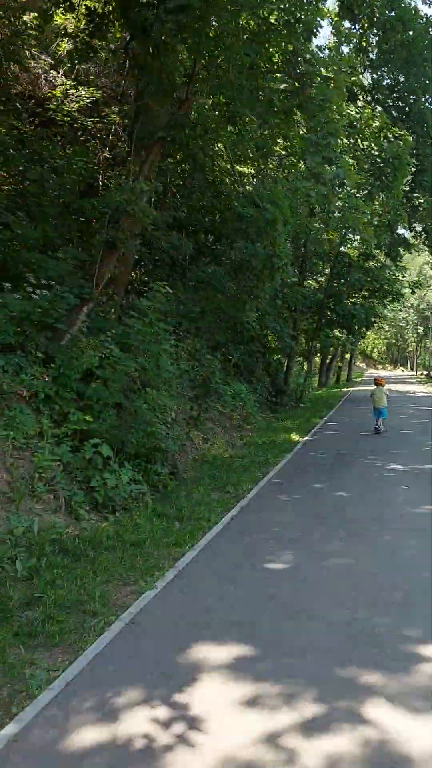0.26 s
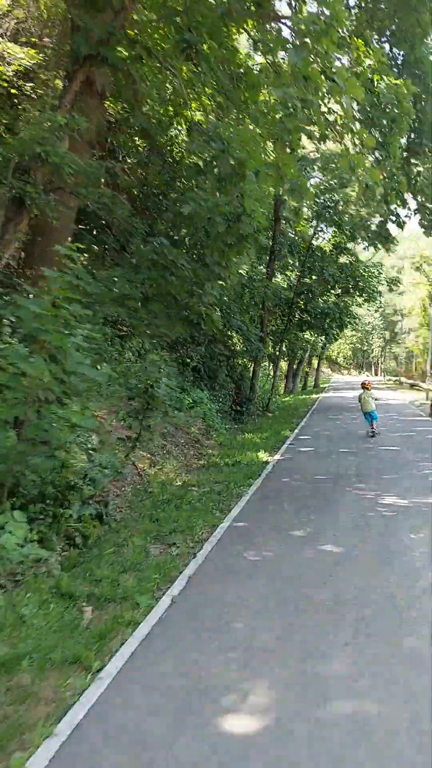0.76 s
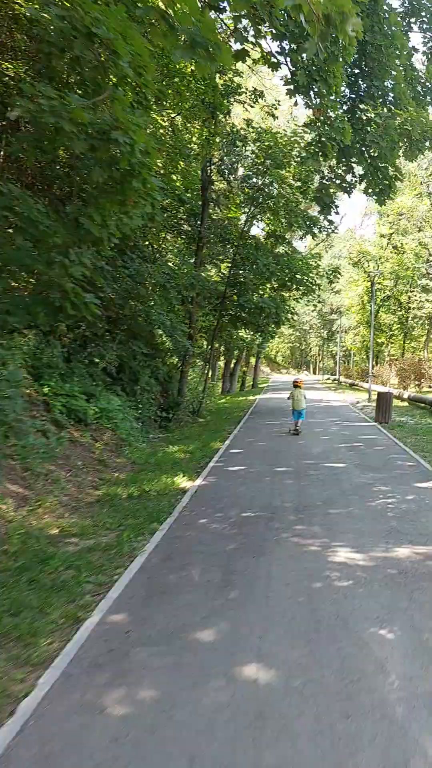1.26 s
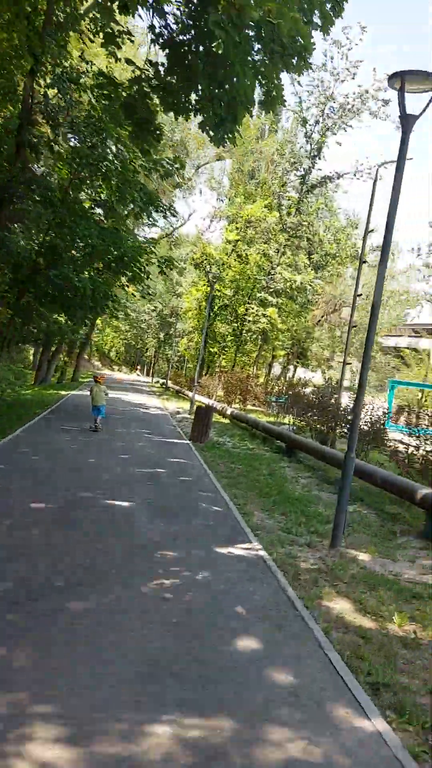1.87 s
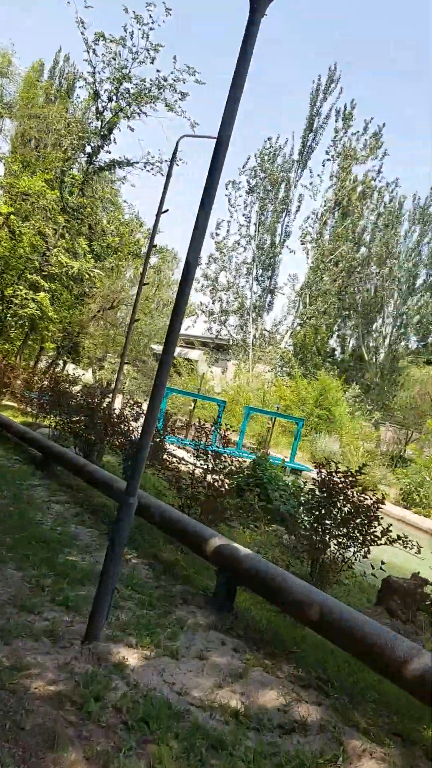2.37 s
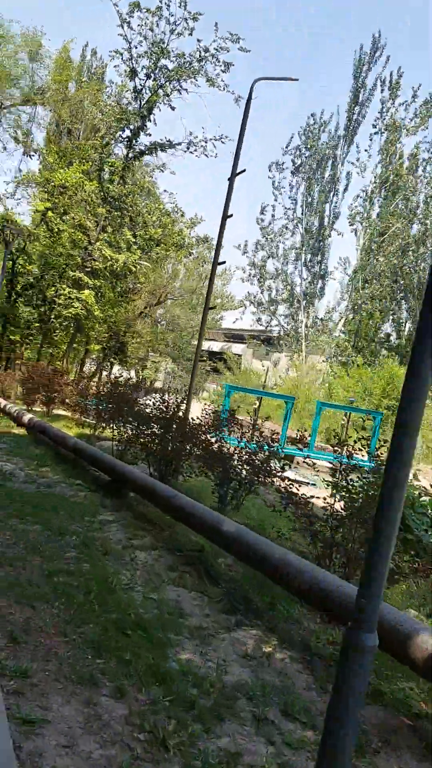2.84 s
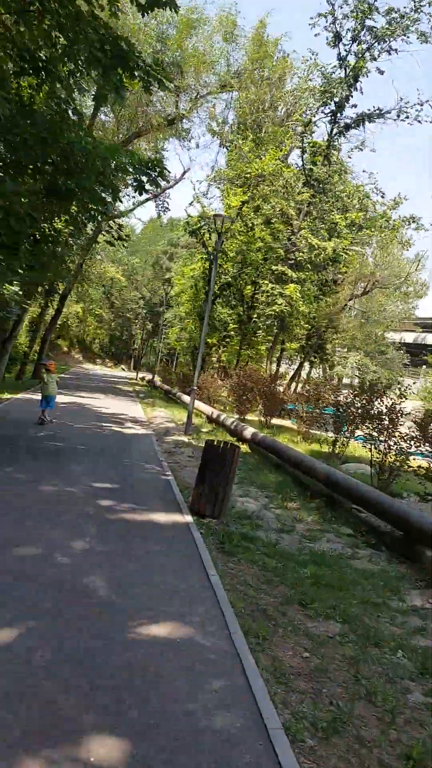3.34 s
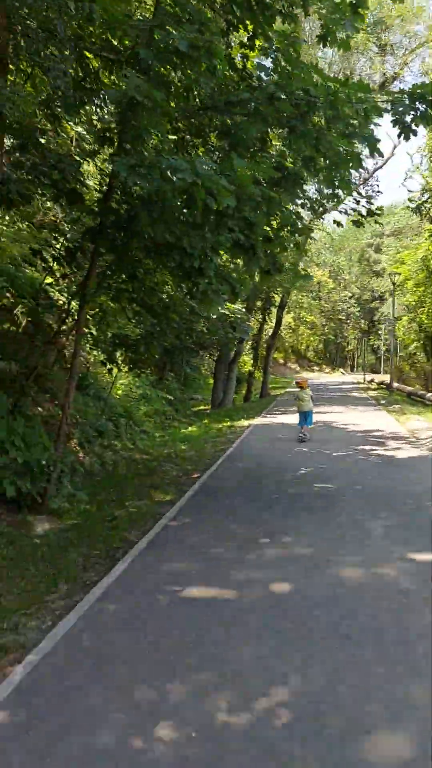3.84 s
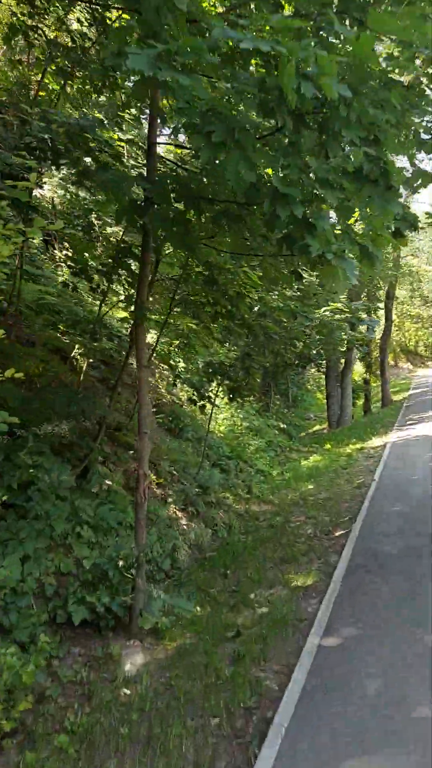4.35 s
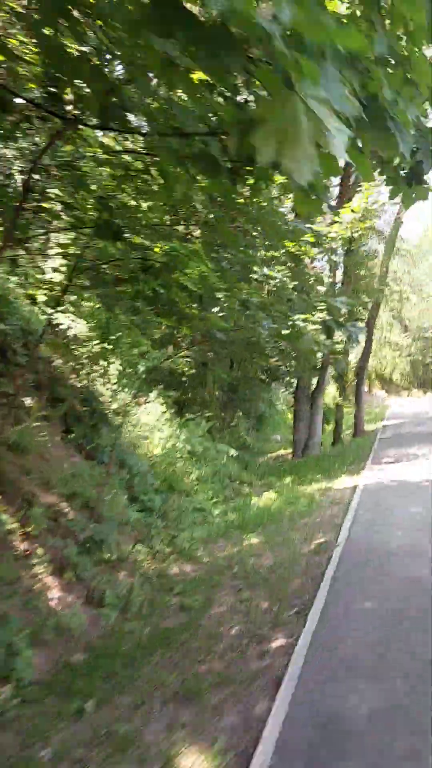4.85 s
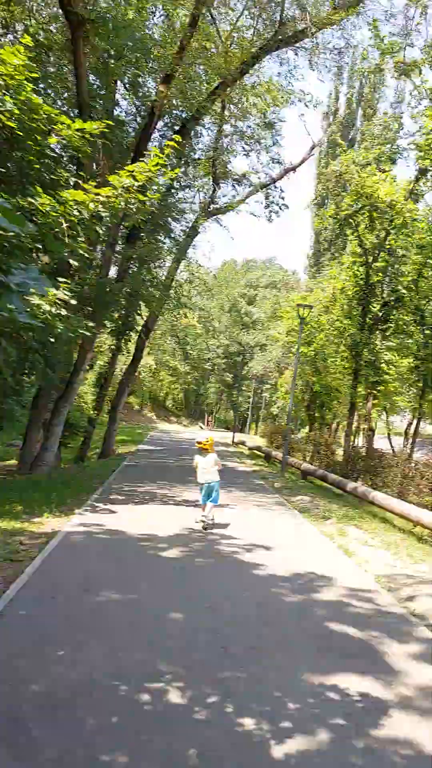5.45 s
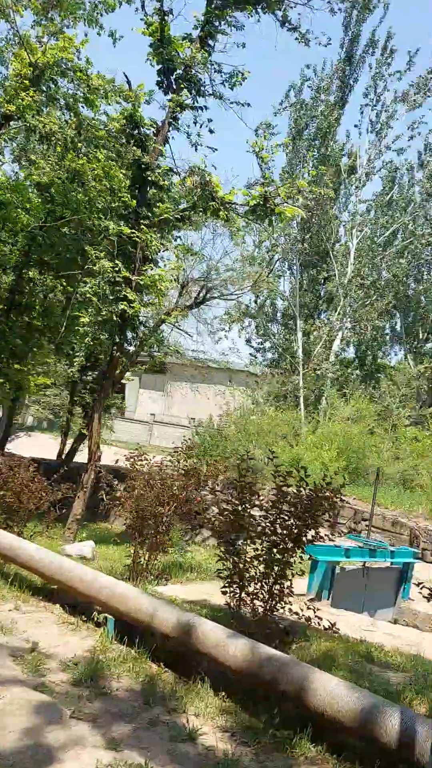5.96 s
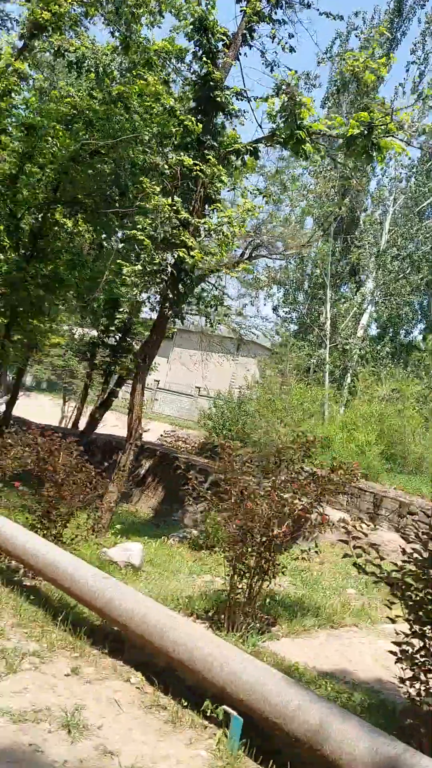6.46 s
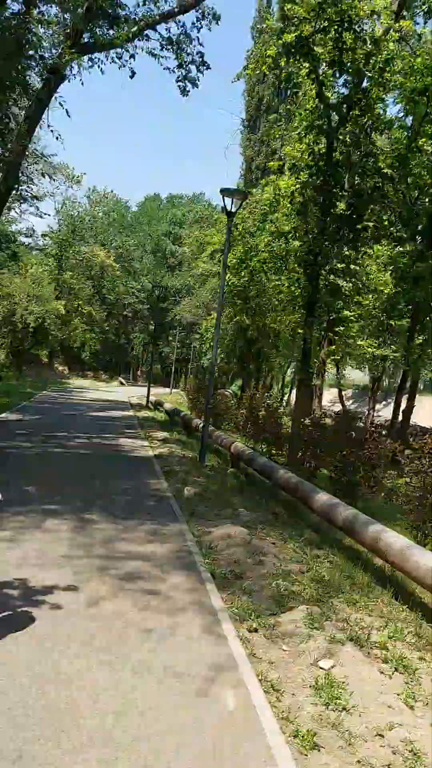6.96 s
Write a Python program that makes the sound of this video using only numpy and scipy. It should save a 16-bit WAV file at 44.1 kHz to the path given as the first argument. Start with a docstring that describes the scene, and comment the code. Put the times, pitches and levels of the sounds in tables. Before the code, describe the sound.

Throughout the seven seconds a skateboard rolls along an asphalt path in the open air, heard close by a handheld stereo phone with no noticeable echo. From the start, a hollow, uneven deck rumble mixes with dry crunching grit, short wheel rattles and dull clacks. Thumps fall at about 0.05, 0.45 and 1.05 s, with sharp ticks before 1.3 s and a brief gust at 0.9. From 1.3 to 3.8 s low crosswind flutters and fizzes on the right, over bumps near 1.4, 1.55, 2.2, 2.4 and 3.5; stony pings and a coarse, sandy burst come around 1.3 to 2.2. The wind then drops sharply, leaving a short gust at 4.05 and clearer rolling. Thumps cluster from 4.2 to 5.1 and 5.5 to 5.8 s. Sand hisses near 5.5 and 6.2 as the crunch grows brightest; another bump hits at 6.5, and rolling continues to the end.

```python
"""A skateboard rolls along an asphalt park path, heard at a phone's two ports in the rider's hand.
From the start, stones drum the deck into a rumble and grains crunch under the tread, with thumps and ticks.
The first gusts buffet within a second; from 1.3 to 3.8 s a crosswind buffets and fizzes at the right port.
Patches of sand burst near 1.7, 5.5 and 6.2 s, and past 5.7 s the crunch is at its brightest.
Sources are random blows or noise, shaped by spectra, resonances and levels that follow time."""
import sys
import numpy as np
from scipy import signal
from scipy.fft import rfft, irfft
from scipy.io import wavfile
from scipy.ndimage import map_coordinates

SR = 44100
rng = np.random.default_rng(int(sys.argv[2]) if len(sys.argv) > 2 else 0)


def int16_out(signal):
    """Quantize to a 16-bit WAV file."""
    q = np.round(np.clip(np.atleast_2d(signal).T, -1, 1) * 32767)
    wavfile.write(sys.argv[1], SR, q.astype(np.int16))


N = 317961
T, HZ = np.arange(N) / SR, np.fft.rfftfreq(N, 1 / SR)
PORT_LAG_S = 21 / SR  # sound from the board reaches the left port this much later

# All levels in the tables are relative: each source adds its own trim.
# A half length or half width is the distance from the centre at which a hump has fallen to half.

# faint hiss, colour: hz, level_db
HISS_COLOUR = [(500, 16.5), (7000, -9), (9000, -4), (12000, 4.5), (16000, 0.5)]
# faint hiss, level in time: time_s, level_db
HISS_LEVEL = [(0, -55), (1.3, -52), (3.76, -64), (3.8, -55), (4.3, -56), (5.3, -53.5), (7.2, -51.5)]
# soft swell of the hiss: peak_s, half_length_s, level_db
HISS_SWELLS = [(.52, 0.25, -55)]
# air stream of the ride: time_s, level_db
AIR_STREAM = [(0, -33), (1.5, -35), (2.0, -35.5), (3.6, -36), (4.35, -35), (4.6, -41.5), (5.0, -35.5),
              (5.6, -36), (6.3, -42.5), (6.8, -35), (7.2, -33.5)]
# wind blowing straight at the right port for a while: time_s, buffeting_db, fizz_db
CROSSWIND = [(1.34, -54, -70), (1.42, -21.5, -50), (1.67, -25.5, -46), (1.75, -30, -45), (1.82, -26.5, -49),
             (2.01, -27.5, -48), (2.14, -21, -47), (2.44, -20.5, -54), (2.52, -27, -47), (2.64, -23.5, -49),
             (2.86, -19, -48.5), (3.22, -21.5, -48.5), (3.5, -20.5, -53), (3.765, -19.5, -58),
             (3.83, -60, -110)]
# single gusts: peak_s, half_length_s, left_port_db, right_port_db
GUSTS = [(0.33, 0.08, -31, -32), (0.88, 0.011, -20.5, -28), (0.95, 0.034, -36, -32),
         (2.307, 0.038, -41, -21), (2.854, 0.014, -42, -17.5), (2.968, 0.026, -36, -18.5),
         (3.284, 0.023, -32, -18.5), (3.662, 0.016, -21, -16), (3.76, 0.045, -27, -34),
         (4.063, 0.017, -23.5, -27)]
# colour of the buffeting: hz, left_port_db, right_port_db
BUFFET_COLOUR = [(15, -32, -23), (30.2, -22, -40), (45.3, -4.5, -7), (62.4, -4, 2.5), (88, -6, 1.5),
                 (139, 1.5, 2), (191, -9.5, -2), (286, -5, -5), (493, -47, -14), (770, -31, -31),
                 (1500, -60, -41), (4000, -80, -85)]
# colour of the fizz: hz, level_db
FIZZ_COLOUR = [(1000, -12), (4000, -11.5), (7000, -15), (8800, -28), (10500, 0), (12500, 11), (15800, 11),
               (17500, -30)]
# crosswind spitting across the right port: peak_s, half_length_s, level_db
SPITS = [(2.842, .008, -50), (2.97, .01, -45), (3.473, .006, -45), (3.62, .014, -54), (3.665, .013, -53),
         (3.72, .006, -49), (3.748, .015, -48)]
# likeness of the board's sound at the two ports: hz, likeness (0-1)
PORT_LIKENESS = [(100, 0.7), (280, 0.88), (520, 1), (850, 0.73), (1500, 0.59), (2150, 0.71), (2500, 0.71),
                 (3600, 0.45), (5000, 0), (16000, 0.4)]
# swinging of the phone: time_s, left_minus_right_db
PHONE_AIM = [(0, 2.5), (1.1, 2), (1.8, 0), (4.2, 2), (7.2, 1.5)]
# larger bits of grit: start_s, level_db, centre_hz, half_width_octaves
TICKS = [(0.117, -31, 4500, .6), (0.364, -24, 3900, .2), (0.857, -26, 6700, 0.3), (0.86, -24, 4100, .12),
         (0.86, -25.5, 7000, 0.33), (1.148, -26, 6300, 0.38), (1.278, -33, 6200, .25),
         (1.435, -33, 6000, .4), (2.019, -27, 12000, 1), (2.213, -29, 11000, 1), (2.293, -34, 10000, 1),
         (2.438, -33, 13000, 0.72), (2.494, -34, 13500, 1), (2.611, -31, 9000, 1), (2.719, -29, 12500, 1),
         (2.648, -34, 12500, 1), (2.741, -33, 12000, 1), (2.761, -36, 10500, 1), (3.107, -34, 12500, 1),
         (3.121, -37, 12000, 1), (3.451, -30, 5000, .6), (3.47, -36, 12500, 1), (4.225, -31, 4200, .5)]
# stretches of loose sand: middle_s, half_length_s, level_db
SAND_PATCHES = [(1.68, .1, -51), (5.5, .17, -56), (6.2, .33, -52)]
# sizzling of the tread: peak_s, half_length_s, level_db
SIZZLES = [(1.69, 0.048, -62), (6.19, 0.064, -53.5), (6.41, 0.13, -57)]
# clacks of the trucks: start_s, level_db, centre_hz
CLACKS = [(0.083, -34, 660), (0.415, -30, 990), (0.955, -28, 660), (1.025, -28, 650), (1.176, -22.5, 670),
          (1.42, -27, 644), (1.53, -29, 1220), (1.635, -27, 1030), (2.075, -35, 1000), (2.413, -32, 650),
          (2.645, -25, 667), (2.759, -32, 700), (2.985, -25, 650), (3.49, -27, 850), (3.611, -31, 990),
          (4.034, -28, 800), (4.084, -36, 860), (4.441, -34, 650), (4.485, -29.5, 765), (4.608, -31, 650),
          (4.675, -30, 740), (4.893, -32, 760), (5.548, -26.5, 790), (6.151, -31, 650), (6.245, -28, 900),
          (6.507, -26, 680)]
# large stones striking a wheel: start_s, level_db, pitch_hz
PINGS = [(0.165, -39, 2150), (.19, -31, 2070), (.615, -32, 2120), (0.485, -29, 2120), (0.778, -29, 2200),
         (1.245, -32, 2150), (1.345, -26, 2150), (1.523, -23, 2140), (1.574, -31, 2120), (1.649, -26, 2190),
         (1.72, -31, 2150), (2.192, -21, 2180), (2.294, -30, 2110), (2.84, -37, 2220), (3.451, -31, 1900),
         (5.912, -26, 2020), (6.025, -36, 2080), (6.68, -34, 1920)]
# ring modes of the wheels: multiple of the singing pitch (ratio), level_db
WHEEL_MODES = [(0.905, -5.5), (1.002, -1), (1.235, -15)]
# runs of stones that set a wheel rattling: middle_s, rise_db, half_length_s
RATTLES = [(0.183, 5, 0.034), (0.28, 5, .035), (0.435, 5, .02), (0.487, 7, .014), (0.62, 4.5, .025),
           (0.80, 2.5, .04), (0.88, 4.5, .04), (1.16, 4.5, .035), (1.33, 2, .025), (1.44, 0, 0.009),
           (1.53, 7.5, .012), (1.89, 1.5, .015), (2.195, 3.5, .012), (2.497, 7, .012), (3.76, 10, .035),
           (3.885, 7, .03), (4.025, 6.5, .04), (4.89, 2, .018), (5.399, 9, 0.022), (5.805, 7, .013),
           (5.919, 5, .014), (6.688, 3, 0.011), (7.038, 6, .014)]
# bumps in the path: start_s, level_db
BUMPS = [(0.042, -16), (0.454, -14), (0.915, -31), (1.043, -12), (1.421, -9.5), (1.558, -14.5),
         (2.197, -16), (2.427, -11.5), (3.418, -31), (3.469, -13), (3.86, -13), (4.242, -16.5),
         (4.314, -12), (4.441, -13.5), (4.605, -24), (4.675, -22), (4.75, -13), (4.934, -9.5), (5.103, -16),
         (5.482, -12.5), (5.595, -10), (5.785, -10.5), (6.149, -20), (6.384, -17), (6.508, -12.5),
         (6.982, -28)]
# ring of the deck after a bump: nominal_pitch_hz, level_db, t60_s
DECK_MODES = [(317.4, 1, 0.085), (381.7, -6, 0.23), (490, 4, 0.079)]
# coarseness of the asphalt, driving crunch, crackle and wheel ring: time_s, level_db
COARSENESS = [(0.0, -45), (0.42, -42.5), (1.28, -42), (1.64, -38), (1.96, -39.5), (2.16, -39), (2.32, -42),
              (2.66, -41), (3.14, -43), (3.6, -43), (3.94, -46), (4.04, -44), (4.12, -45), (4.7, -46.5),
              (5.67, -43.5), (5.77, -44), (5.82, -39.5), (6.04, -42), (6.7, -40.5), (6.78, -42), (7.2, -40)]
# colour along the path: time_s, brighter_share (0-1), singing_hz, singing_above_crunch_db
PATH_COLOUR = [(0, 0.3, 2060, -5), (.45, 0.3, 2110, -3.5), (.78, 0.24, 2156, -1), (1.05, 0.24, 2170, -5),
               (1.35, 0.17, 2130, -0.5), (2.2, 0.52, 2100, -3), (2.45, 0.4, 2080, -7.5),
               (3.55, 0.52, 2140, -3.5), (3.78, 0.6, 2050, -8.5), (4.03, 0.5, 2110, -2),
               (4.14, 0.53, 2150, -9), (5.2, 0.57, 2090, -4), (5.7, 0.7, 2080, -12), (5.85, 0.83, 1900, -3),
               (6.2, 0.8, 1890, -0.5), (7.2, 0.63, 1910, -6.5)]
# colour of the tread contact: hz, plain_db, brighter_db
TREAD_COLOUR = [(402, -14, -26), (824, 8, -5), (1130, -5.5, 2), (1180, -2, 1.5), (1474, 5, -6),
                (1630, -8, 0.5), (1766, -0.5, -4), (2100, -9, -1.5), (2510, -5, -8), (3060, -10, -9.5),
                (3600, -10.5, -11.5), (5200, -19.5, -13), (7420, -21.5, -15), (8850, -31.5, -27.5),
                (12000, -53, -26.5), (16000, -40, -34)]
# rough spots under the wheels: middle_s, rise_db, half_length_s
RASPS = [(0.067, 4.5, 0.018), (0.19, 0, .015), (0.487, 2, 0.0089), (1.163, 4, 0.022), (1.436, 6.5, 0.016),
         (1.533, 2.5, 0.009), (1.70, 3, 0.052), (1.888, 3, 0.014), (2.062, 5, .014), (2.201, 7, 0.0067),
         (2.5, 4.5, .009), (2.723, 2, .012), (2.964, 2.5, 0.0092), (3.485, 5, 0.024), (3.617, 2.5, .012),
         (3.746, 4, 0.02), (4.017, 2, .016), (4.229, 5, 0.011), (4.909, 6, 0.018), (5.031, 6, 0.0084),
         (5.353, 4, 0.017), (5.552, 1, 0.016), (5.675, 4, 0.018), (5.81, 0, .012), (5.925, 1.5, .012),
         (5.979, 4, .008), (6.03, 4, 0.014), (6.16, 1.5, 0.013), (6.343, 3.5, 0.011), (6.448, 4, .016),
         (6.688, 5, 0.012), (7.189, -1, 0.0063)]
# deck mode that sings out most: time_s, pitch_hz, strength_db
DRONE = [(0, 437, -18), (.5, 322, 1), (1.1, 340, -6.5), (2.2, 238, -8.5), (2.8, 238, -16),
         (3.45, 373, -0.5), (4.4, 390, -12), (5.0, 450, -1.5), (5.9, 433, -3.5), (6.4, 407, -2),
         (6.75, 451, -0.5), (7.1, 490, 7.5)]
# shaking of the board by the road: time_s, level_db
ROAD_SHAKE = [(0.0, -25), (0.68, -26), (0.94, -23), (1.1, -25), (1.25, -24), (1.6, -24.5), (2.04, -26.5),
              (2.16, -23), (2.44, -24), (2.51, -25), (2.66, -22.5), (2.96, -22.5), (3.32, -24.5),
              (3.46, -22), (3.68, -29), (4.74, -27.5), (4.9, -23.5), (5.62, -23.5), (6.3, -28), (6.48, -23),
              (6.9, -28.5), (7.04, -29.5), (7.2, -29.5)]
# undulations that load or unload the wheels: middle_s, change_db, half_length_s
SWAYS = [(0.056, 3, 0.014), (0.122, 2.5, 0.012), (0.58, -2, 0.037), (0.785, -3, 0.028), (0.85, 2, 0.022),
         (0.905, -12, 0.0087), (1.074, 1, .022), (1.631, 1.5, 0.021), (2.292, 1.5, 0.03), (2.435, 2, 0.017),
         (3.423, 0.5, .018), (3.54, 2.5, 0.011), (3.614, 3.5, 0.03), (3.70, 0.5, .04), (4.059, 2.5, 0.016),
         (4.395, 3.5, .02), (4.57, -11, 0.0089), (4.944, 0, 0.023), (5.25, -3.5, .012), (5.465, -4, 0.01),
         (5.602, 2.5, 0.023), (5.795, 2.5, 0.014), (6.365, -7, 0.0055), (6.405, 1, 0.023),
         (6.604, 3, 0.011), (6.86, -4.5, .025)]
# response of wheels and deck: hz, level_db
DECK_RESPONSE = [(30, -36), (75, -66), (125, -28), (185, -6.5), (240, 1.5), (320, 2), (400, -0.7),
                 (480, 1.34), (545, -1), (610, -9), (700, -9.5), (820, -17.5), (1100, -27), (4000, -80)]
# depth of the rumble: time_s, bass_lift_db
RUMBLE_DEPTH = [(0, -0.5), (2.2, -0.5), (4, -5.5), (5.8, -6.5), (6.35, -18.5), (7.2, 9)]


def gain_of(db):
    """Logarithmic level: decibels to amplitude gain."""
    return 10 ** (np.asarray(db) / 20)


def evened(x):
    """Normalisation of energy: scales to rms 1."""
    return x / np.sqrt(np.mean(x ** 2) + 1e-20)


def curve(rows, order=1):
    """Linear interpolation: one column of a time table at every sample."""
    columns = np.transpose(rows)
    return np.interp(T, columns[0], columns[order])


def spectrum(rows, order=1):
    """Interpolation over log frequency: one column of a frequency table at every bin."""
    columns = np.transpose(rows)
    return np.interp(np.log(HZ + 1), np.log(columns[0]), columns[order])


def coloured(x, db):
    """Linear filtering: one gain for each frequency bin, then rms 1."""
    return evened(irfft(rfft(x) * gain_of(db), N))


def shelf(x, corner_hz, lift_db):
    """Shelving filter: lifts what lies above the corner, by an amount that may vary in time."""
    above = irfft(rfft(x) * HZ ** 4 / (HZ ** 4 + corner_hz ** 4), N)
    return x + above * (gain_of(lift_db) - 1)


def resonate(x, hz, width_hz):
    """Resonance: two equal poles in a frame turning with the moving centre; rms 1."""
    turn = np.exp(2j * np.pi * np.cumsum(hz * np.ones(N)) / SR)
    r = np.exp(-np.pi * width_hz / SR)
    ringing = signal.lfilter([1], [1, -2 * r, r * r], x / turn)
    return evened((turn * ringing).real)


def wander(rate_hz):
    """Low-passed chance: random modulation of rms 1, up to about the given rate."""
    t = T[::100]
    hz = np.fft.rfftfreq(len(t), t[1])
    slow = irfft(rfft(rng.standard_normal(len(t))) / (1 + (hz / rate_hz) ** 2), len(t))
    return np.interp(T, t, evened(slow))


def swell(s, half_length):
    """Amplitude envelope: a rounded rise and fall of height 1."""
    return 1 / (1 + np.square(np.square((T - s) / half_length)))


def humps_db(rows):
    """Level modulation: a brief, rounded change in decibels for each row, all added."""
    t = T[::40]
    total = sum(db / (1 + ((t - s) / length) ** 4) for s, db, length in rows)
    return np.interp(T, t, total)


def stones(per_s, spread_db, fine):
    """Random impulse excitation: two rows of tiny uneven blows over a bed of fine grain."""
    size = gain_of(spread_db * np.minimum(rng.exponential(1, N), 4))
    struck = rng.random(N) < per_s / SR
    blows = evened(size * struck * rng.choice([-1., 1.], (2, N)))
    return evened(blows + fine * rng.standard_normal((2, N)))


def snaps(per_s, decay_s):
    """Exponential decay: an envelope of random snaps that start sharply and die away."""
    cracks = (rng.random(N) < per_s / SR) * rng.uniform(.3, 1, N)
    return signal.lfilter([1], [1, -np.exp(-1 / (decay_s * SR))], cracks)


def patchy(x, depth_db, wide_hz, long_s):
    """Time-frequency modulation: brief random patches of level give grain clusters their own colour."""
    hz, t, z = signal.stft(x, SR, nperseg=256)
    at = np.meshgrid(hz / max(wide_hz, hz[1]), t / max(long_s, t[1]), indexing="ij")
    patches = evened(map_coordinates(rng.standard_normal(z.shape[1:]), at, order=1))
    return signal.istft(z * gain_of(depth_db * patches), SR)[1][:, :N]


def ports(x):
    """Partial coherence and delay: the right port hears first, and likeness depends on frequency."""
    direct, scattered = rfft(x)
    same = np.clip(spectrum(PORT_LIKENESS), 0, 1)
    mixed = same * direct + np.sqrt(1 - same ** 2) * scattered
    left = mixed * np.exp(-2j * np.pi * HZ * PORT_LAG_S)
    return irfft(np.array([left, direct]), N)


def hiss(left_db=-16, swell_left_db=-3):
    """Filtered noise: a faint hiss, mostly on the right, with a soft swell of it on both sides."""
    steady = gain_of(curve(HISS_LEVEL)) * gain_of([[left_db], [0]])
    swells = sum(gain_of(db) * swell(s, half) for s, half, db in HISS_SWELLS)
    level = np.hypot(steady, swells * gain_of([[swell_left_db], [0]]))
    return coloured(rng.standard_normal((2, N)), spectrum(HISS_COLOUR)) * level


def eddies(order, gust_db):
    """Turbulent pressure: eddies press on one port, unrelated to those at the other."""
    pressure = rng.standard_normal(N) * gain_of(gust_db * wander(rate_hz=42))
    return coloured(pressure, spectrum(BUFFET_COLOUR, order))


def wind(left_db=1.74, right_db=1.5, deep_hz=100, deep_slope=1.0, deep_from_db=-33):
    """Turbulent forcing: stream, crosswind and gusts add at each port; weak air loses its deepest eddies."""
    air_db = curve(AIR_STREAM)
    # shelter of the right port: 12 dB in air of -36 dB, and less as the air strengthens
    shelter_db, shelter_slope, reference_db = 12, 1, -36
    sheltered_db = air_db - shelter_db + shelter_slope * (air_db - reference_db)
    steady = np.array([gain_of(air_db), gain_of(sheltered_db) + gain_of(curve(CROSSWIND))])
    gusts = sum(gain_of([[left], [right]]) * swell(s, half) for s, half, left, right in GUSTS)
    force = np.hypot(steady, gusts)
    # air at least as strong as deep_from_db keeps its full depth
    deep_db = deep_slope * np.minimum(20 * np.log10(force) - deep_from_db, 0)
    buffet = np.array([eddies(order=1, gust_db=2.0), eddies(order=2, gust_db=1.0)])
    # lowering everything and lifting the upper part back thins only the bass
    thinned = shelf(buffet, deep_hz, -deep_db) * gain_of(deep_db)
    return thinned * force * gain_of([[left_db], [right_db]])


def fizz(trim_db=-5.5, air_db=-28, flutter_db=1.9, left_db=-19):
    """Fine turbulence: air sputters mostly across the right port, with spits late in the crosswind."""
    air = coloured(stones(per_s=650, spread_db=4.0, fine=2.0), spectrum(FIZZ_COLOUR))
    force = np.hypot(gain_of(curve(CROSSWIND, order=2)), gain_of(curve(AIR_STREAM) + air_db))
    spits = sum(gain_of(db) * swell(s, half) for s, half, db in SPITS)
    force = np.hypot(force, spits)
    flutter = gain_of(trim_db + flutter_db * wander(rate_hz=24))
    return air * force * flutter * gain_of([[left_db], [0]])


def ticks(decay_s=0.0012, left_db=-13, trim_db=3.5):
    """Impulsive contact: each bit of grit gives a band-limited snap a millisecond or two long."""
    out, t, hz = np.zeros(N), np.arange(512) / SR, np.fft.rfftfreq(512, 1 / SR)
    # the port passes less around 9.5 kHz
    port = gain_of(-10 * np.exp(-((hz - 9500) / 2000) ** 2))
    for s, db, centre_hz, octaves in TICKS:
        snap = rng.choice([-1., 1.], len(t)) * np.exp(-t / decay_s)
        band = port / (1 + (np.log2((hz + 1) / centre_hz) / octaves) ** 2)
        snap = np.convolve(snap, np.fft.fftshift(irfft(band)))
        start = round(s * SR) - len(t) // 2  # undoes the delay of the centred filter
        out[start:start + len(snap)] += gain_of(db + trim_db) * snap
    return out * gain_of([[left_db], [0]])


def sand(low_hz=3000, high_hz=7500, count=14):
    """Superposed damped oscillations: sand grains burst under the tread at a set of pitches."""
    per_s, cycles, t = 110, 10, np.arange(600) / SR  # rate at each pitch; cycles to decay by 1/e
    out = np.zeros((2, N))
    for hz in np.geomspace(low_hz, high_hz, count):
        grain = np.sin(2 * np.pi * hz * t) * np.exp(-t * hz / cycles)
        starts = np.flatnonzero(rng.random(N - len(t)) < per_s / SR)
        sizes = rng.uniform(.2, 1, (len(starts), 2, 1))
        for start, size in zip(starts, sizes):
            out[:, start:start + len(t)] += size * grain
    return evened(out) * sum(gain_of(db) * swell(s, half) for s, half, db in SAND_PATCHES)


def sizzle(centre_hz=7200, width_hz=1100):
    """Broad resonance: a thin, high sizzle of the tread swells on some stretches of asphalt."""
    grains = stones(per_s=600, spread_db=2.0, fine=0.7) * gain_of(2.0 * wander(rate_hz=25))
    swells = sum(gain_of(db) * swell(s, half) for s, half, db in SIZZLES)
    return resonate(grains, centre_hz, width_hz) * swells


def clacks(width_hz=330, decay_s=0.019, trim_db=-4.5):
    """Damped broad resonance: the trucks give short, dull rattles."""
    bursts = sum(gain_of(db) * (T >= s) * np.exp(-abs(T - s) / decay_s) for s, db, hz in CLACKS)
    rattle = resonate(ports(rng.standard_normal((2, N))), curve(CLACKS, order=2), width_hz)
    return rattle * bursts * gain_of(trim_db)


def pings(trim_db=-3, decay_s=0.0048, width_hz=220, left_db=-7.0):
    """Struck resonator: a single large stone makes a wheel ring briefly, on a pitch curve."""
    blows = sum(gain_of(db) * (T >= s) * np.exp(-abs(T - s) / decay_s) for s, db, hz in PINGS)
    ring = resonate(ports(rng.standard_normal((2, N))), curve(PINGS, order=2), width_hz)
    return ring * blows * gain_of(trim_db) * gain_of([[left_db], [0]])


def sides_db(right_db):
    """Level difference: splits the phone's aim, less a lift of the right, over the two ports."""
    return (curve(PHONE_AIM) - right_db) * np.array([[.5], [-.5]])


def wheel_ring(trim_db=-4, right_db=6.0, rough_share=0.7):
    """Modal excitation: stones strike the hard wheels, whose modes ring in wavering rattles."""
    width_hz, waver_hz, lumpy_db = 190, 45, 1.2
    sound = 0
    for ratio, db in WHEEL_MODES:
        grains = ports(stones(per_s=420, spread_db=1.8, fine=0.75))
        grains = grains * gain_of(lumpy_db * wander(rate_hz=35))
        pitch_hz = ratio * curve(PATH_COLOUR, order=2) + waver_hz * wander(rate_hz=25)
        sound = sound + gain_of(db) * resonate(grains, pitch_hz, width_hz)
    clumps_db = rough_share * humps_db(RASPS) + humps_db(RATTLES)
    singing_db = curve(COARSENESS) + curve(PATH_COLOUR, order=3)
    return sound * gain_of(singing_db + trim_db + clumps_db + sides_db(right_db))


def bumps(trim_db=-6.5, rise_s=0.0025, left_db=-2.0):
    """Free vibration: a wheel climbs a bump in a few milliseconds and sets the deck modes ringing."""
    out, t = np.zeros(N), np.arange(SR // 10) / SR
    for (s, db), chances in zip(BUMPS, rng.random((len(BUMPS), len(DECK_MODES)))):
        thump = 0
        for (hz, mode_db, t60), chance in zip(DECK_MODES, chances):
            pitch_hz = hz * (.92 + .16 * chance)  # each bump shifts each mode by up to 8 %
            thump = thump + gain_of(mode_db - 60 * t / t60) * np.sin(2 * np.pi * pitch_hz * t)
        start = round(s * SR)
        out[start:start + len(t)] += gain_of(db + trim_db) * thump * (1 - np.exp(-t / rise_s))
    left = gain_of(left_db) * np.interp(T - PORT_LAG_S, T, out)
    return np.array([left, out])


def crackle(trim_db=-12):
    """Impulsive fracture: larger stones crack under a wheel, with a sharp start and a short rattle."""
    cracks = ports(rng.standard_normal((2, N)) * snaps(per_s=60, decay_s=0.015))
    return coloured(cracks, spectrum(TREAD_COLOUR, order=2)) * gain_of(curve(COARSENESS) + trim_db)


def crunch(trim_db=0.2, right_db=2.6, lumpy_db=0.5, steady_share=0.17,
           treble_hz=3000, rustle_db=.5, top_hz=5500, top_rustle_db=-1.0):
    """Granular contact noise: grains snap under the tread, in clumps where the road is rough."""
    grains = ports(stones(per_s=900, spread_db=1.5, fine=1.6))
    grains = patchy(grains, depth_db=1.55, wide_hz=481, long_s=.025)
    bright = np.clip(curve(PATH_COLOUR), 0, 1)
    plain_sound = coloured(grains, spectrum(TREAD_COLOUR))
    bright_sound = coloured(grains, spectrum(TREAD_COLOUR, order=2))
    sound = (1 - bright) * plain_sound + bright * bright_sound
    clumps_db = humps_db(RASPS) + lumpy_db * wander(rate_hz=41)
    # the fine hiss is steadier than the coarse crunch, and rustles on its own in two bands
    sound = shelf(sound, treble_hz, rustle_db * wander(rate_hz=17.0) - steady_share * clumps_db)
    sound = shelf(sound, top_hz, top_rustle_db * wander(rate_hz=9.2))
    return sound * gain_of(curve(COARSENESS) + trim_db + clumps_db + sides_db(right_db))


def deck_drone(width_hz=95, waver_hz=22, surge_db=1.0, trim_db=-5, left_db=-1):
    """Bending resonance: one deck mode sings out of the rumble, shifting in pitch and surging."""
    shake = ports(stones(per_s=300, spread_db=-0.5, fine=0.83))
    shake = shake * gain_of(surge_db * wander(rate_hz=15))
    sound = resonate(shake, curve(DRONE) + waver_hz * wander(rate_hz=3), width_hz)
    level_db = curve(ROAD_SHAKE) + humps_db(SWAYS) + curve(DRONE, order=2) + trim_db
    return sound * gain_of(level_db) * gain_of([[left_db], [0]])


def rumble(trim_db=-0.47, right_db=1.28, lumpy_db=0.2, surge_db=0.39, bass_hz=350):
    """Forced vibration: stones drum through the wheels into the deck, surging as the path undulates."""
    shake = ports(stones(per_s=1500, spread_db=1.5, fine=1.41))
    shake = shake * gain_of(lumpy_db * wander(rate_hz=35) + surge_db * wander(rate_hz=30.0))
    depth_db = curve(RUMBLE_DEPTH)
    # lifting everything and lowering the upper part back moves only the bass
    sound = shelf(coloured(shake, spectrum(DECK_RESPONSE)), bass_hz, -depth_db) * gain_of(depth_db)
    level_db = curve(ROAD_SHAKE) + humps_db(SWAYS) + trim_db
    return sound * gain_of(level_db) * gain_of([[0], [right_db]])


def scene():
    """Superposition: the air at the ports and the board below add linearly."""
    air = hiss() + wind() + fizz()
    grit = ticks() + sand() + sizzle() + crackle() + crunch()
    wheels = clacks() + pings() + wheel_ring()
    deck = bumps() + deck_drone() + rumble()
    return air + grit + wheels + deck


def record(dry):
    """Band limitation: a linear-phase low-pass at 15.9 kHz."""
    low_pass = signal.firwin(511, 15900, window=("kaiser", 9), fs=SR)
    return signal.oaconvolve(dry, low_pass[None], "same")


dry = scene()
out = record(dry)
int16_out(out)
```